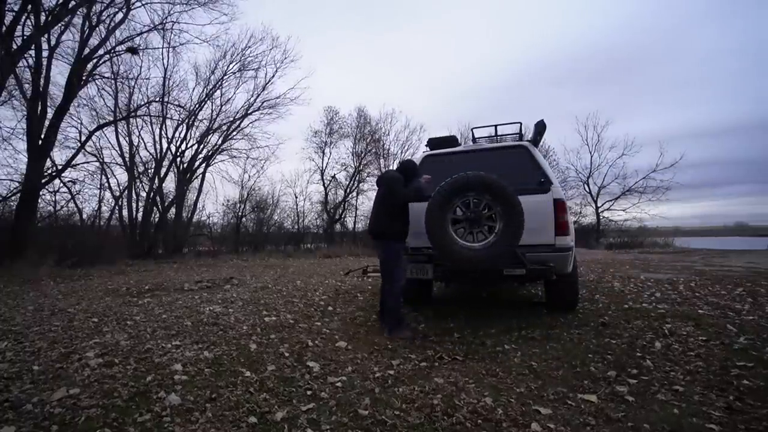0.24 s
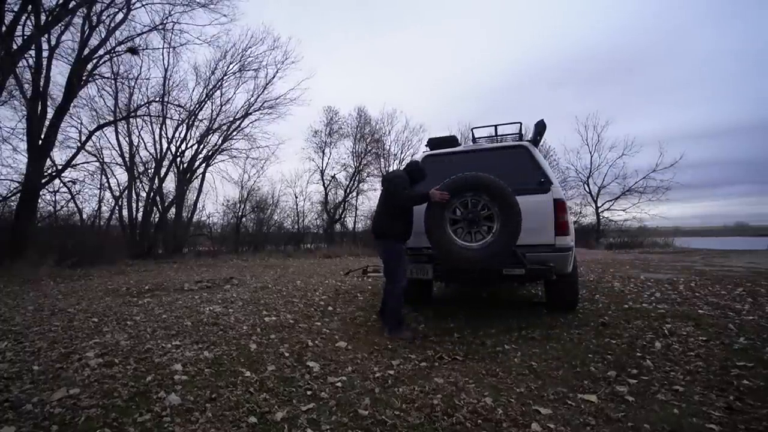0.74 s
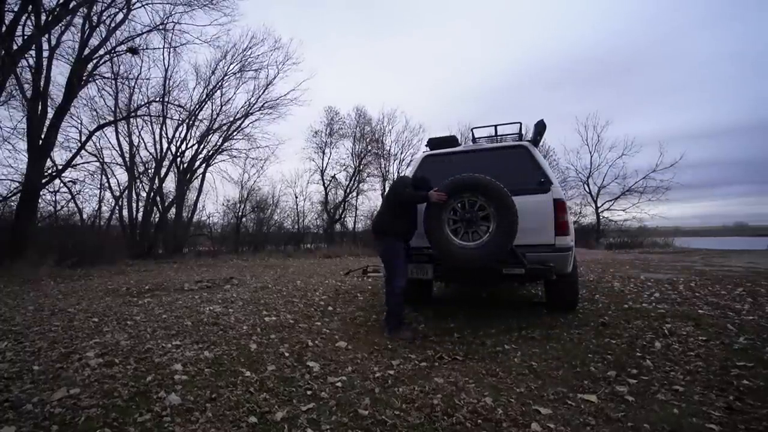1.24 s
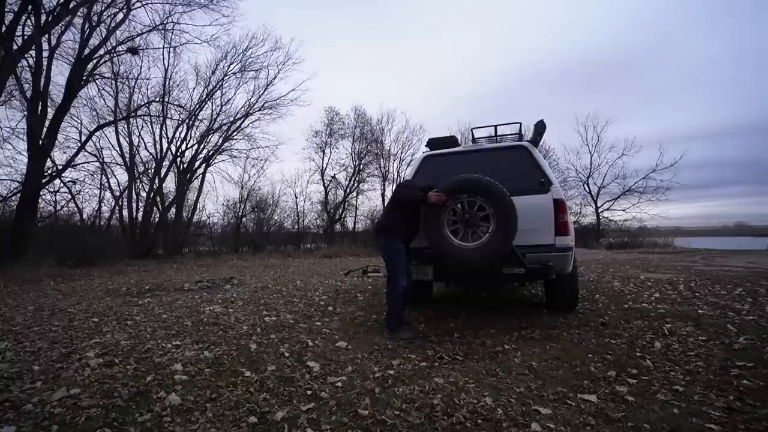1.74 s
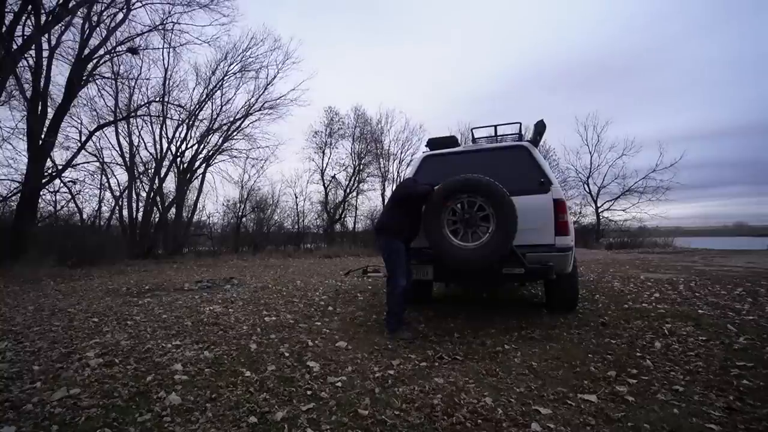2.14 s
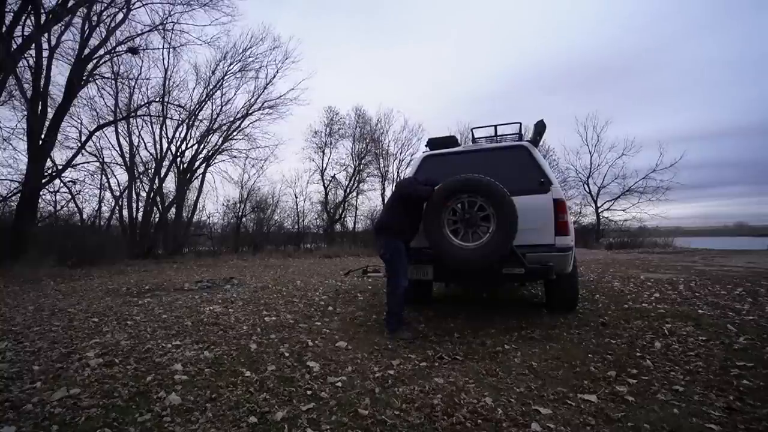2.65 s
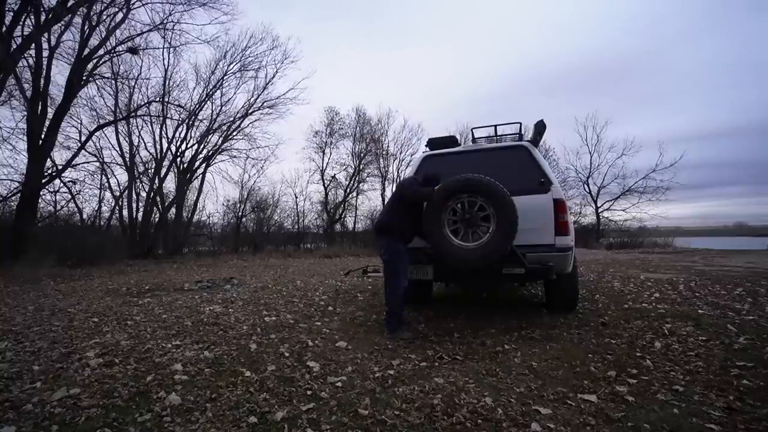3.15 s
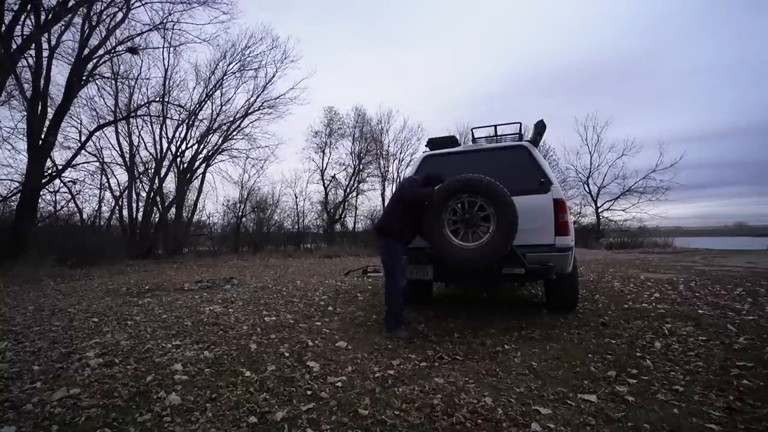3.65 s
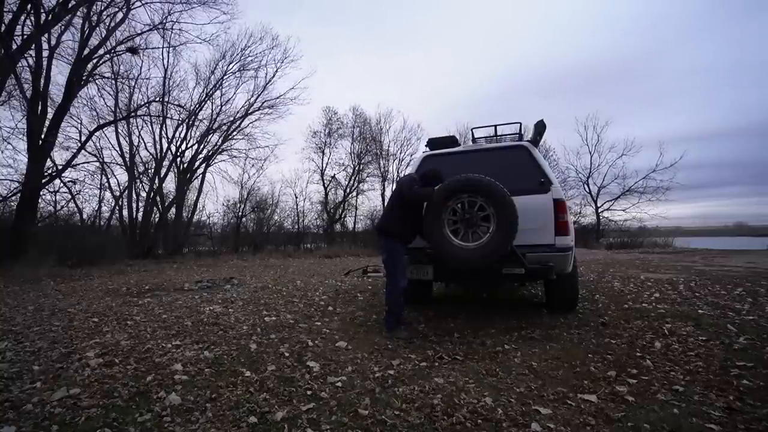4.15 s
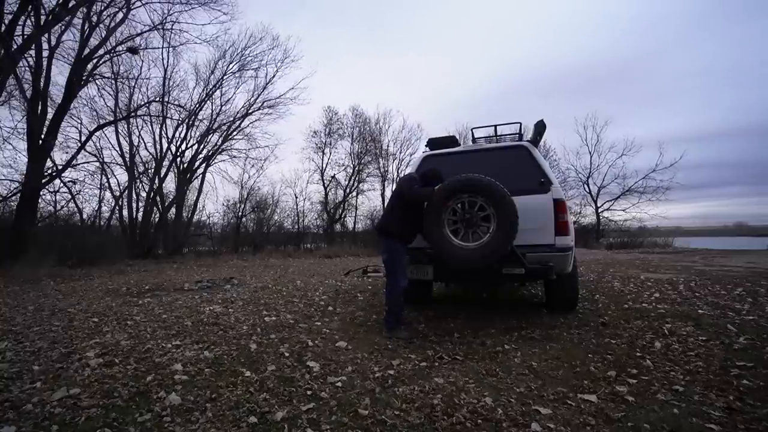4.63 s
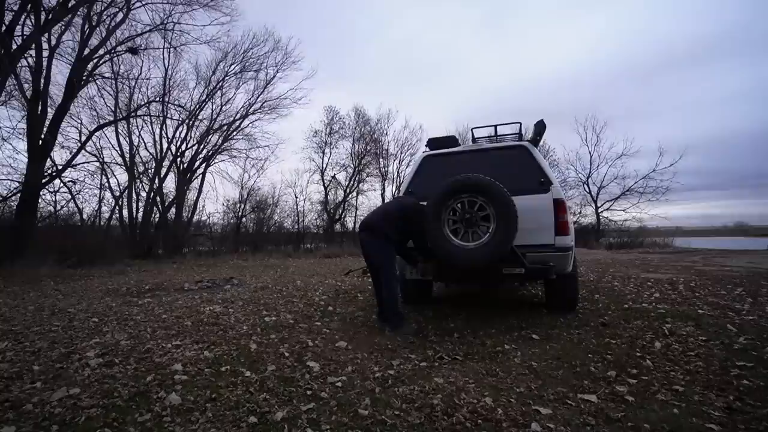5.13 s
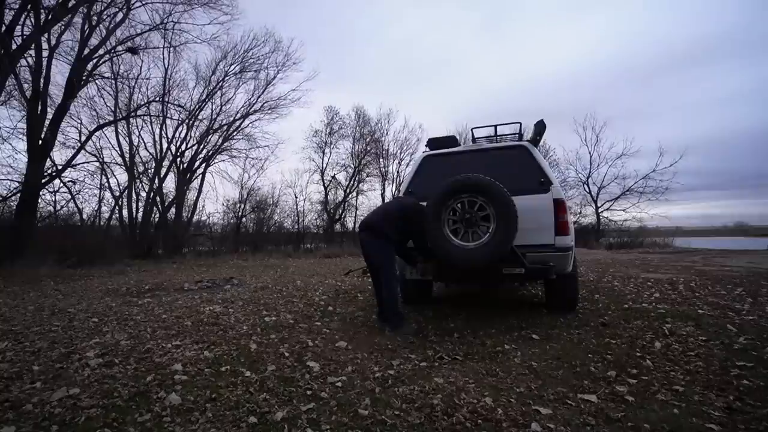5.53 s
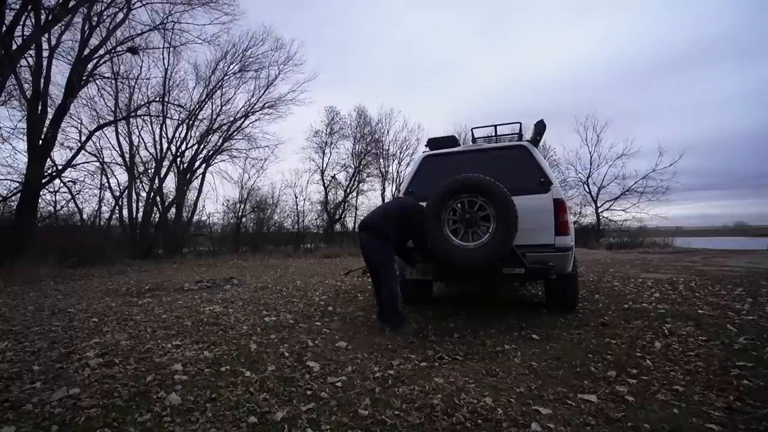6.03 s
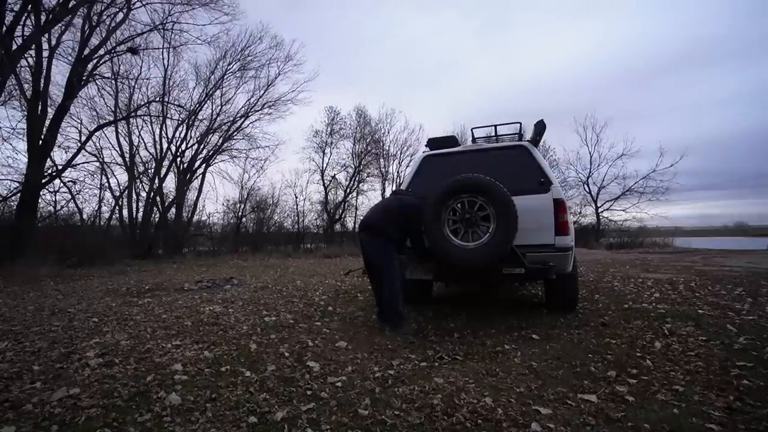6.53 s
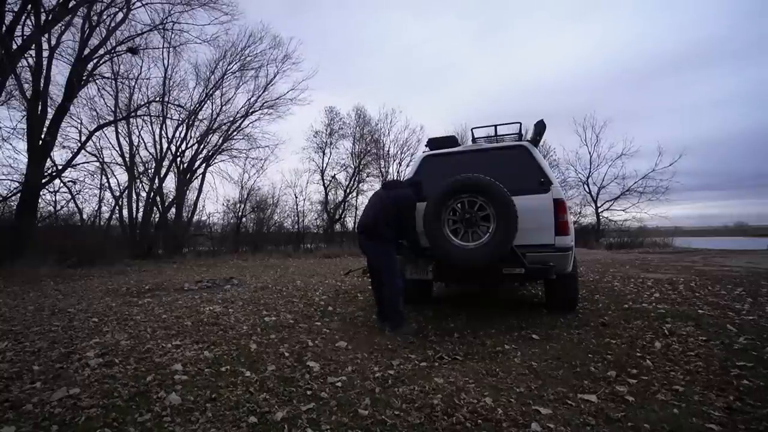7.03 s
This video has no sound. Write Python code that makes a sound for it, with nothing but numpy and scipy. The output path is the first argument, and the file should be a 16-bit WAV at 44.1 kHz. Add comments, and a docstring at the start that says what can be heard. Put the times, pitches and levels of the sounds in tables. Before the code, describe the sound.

One ringing metal slam on a truck, followed by sharp latch clanks and small pin squeaks, with light wind and distant rumble.

```python
"""An open field, at the back of a truck. A steel swing arm carrying a spare wheel hums on its hinge and
slams into the tailgate; then its latch and pin are worked. Each clank rings the steel's modes over a
dense clatter, the pin squeaks by stick-slip, and the tree line answers with a dull tail. Twigs and
small parts tick, cloth and leaves rustle, and a far rumble and faint wind in bare trees fill the air."""
import sys
import numpy as np
from scipy import signal
from scipy.fft import rfft, irfft, next_fast_len
from scipy.io import wavfile
from scipy.ndimage import uniform_filter1d, map_coordinates

SR = 44100
rng = np.random.default_rng(int(sys.argv[2]) if len(sys.argv) > 2 else 0)


def pcm_store(signal):
    """Save signal as 16-bit PCM."""
    levels = np.round(np.clip(np.atleast_2d(signal), -1, 1) * 32767)
    wavfile.write(sys.argv[1], SR, levels.astype(np.int16).T)


N = 321081

# The ring of the steel arm and its latch: pitch_hz, gain_db, t60_s
STEEL_MODES = [(708, -6.5, .24), (826, -9, .13), (1040, -10, .26), (1140, -5, .11), (1225, -9, .23),
               (1310, -17, .3), (1355, -11, .2), (1400, -12.5, .12), (1452, -15, .55), (1505, -10.5, .2),
               (1625, -13, .36), (1690, -17, .35), (1843, -10.5, .25), (1882, -9, .15), (1960, -10, .18),
               (2245, -11, .25), (2345, -7.5, .14), (2665, -17, .15), (3023, -22, .9), (3240, -16, .39),
               (3365, -17, .47), (3735, -6, .07), (4062, -9, .21), (4857, -12, .26), (5030, -9, .13),
               (5380, -14, .21), (5776, -13, .21)]
# Hits on the steel, the slam first: start_s, gain_db, brightness_db_per_octave, bass_db, contact_ms,
# hand_damping_ratio, clatter_db, treble_cut_db_per_octave, then three pairs of pitch_hz, boost_db
# for the modes that the contact point favours
HITS = [(1.297, -11.5, -6.5, -2, 7.5, 1.13, 7, -1, 1140, 12, 3365, 4.5, 1690, 7.6),
        (3.524, -54.5, -2, 16.5, 7.2, 1.1, 5, -3, 1045, 19, 825, 9, 1140, 3),
        (3.584, -47, -8.5, 8, 5, 1.3, 8, 0, 1040, 15, 1400, 5, 1140, 3),
        (3.646, -40, 2.5, -2, 13, 0.93, -4, 0, 1400, 21.4, 3740, 12.5, 3022, 10),
        (3.72, -43.5, 2, 2, 3.5, 1.8, 7, 1, 3022, 9, 3740, 9, 2345, 3.6),
        (3.754, -45.5, -2, 1, 4, .98, 4, 1, 3022, 5, 3740, 10, 1225, 4.5),
        (3.779, -46, -0.5, 4, 4, 1.2, 0, -2, 1400, 7, 1880, 5, 3365, 5.5),
        (4.135, -29, -0.5, 3, 1.8, 0.94, 8, 12, 5380, 13, 708, 6, 3365, 2.7),
        (4.330, -24, -10, 2.5, 3.9, 1.2, 2, -10, 1505, 14.3, 1690, 17, 4062, 7.7),
        (4.422, -34, -17, -6, 3.2, 1.3, -16, -3, 1140, 12, 1505, -1, 1625, 5.7),
        (4.552, -17.5, -1.5, -3.5, 2.7, 1.12, 3.5, -4, 1452, 3.5, 5776, 11, 1040, 7.4),
        (4.809, -44.5, -8, 0, 4, 0.22, -5, -5, 1960, 7, 2245, 11, 1040, 4.6),
        (4.846, -27, -1.5, -0.5, 3.7, 1.44, 4.3, -4, 1845, 9.3, 4856, 11, 3365, 5.9),
        (5.082, -41, -5, -3, 4, 0.82, -18, -6, 1505, 11, 1140, 5, 3365, 4),
        (5.744, -31, 0, 1, 3.3, 1.3, 6, 5, 1400, 16.8, 2245, 13, 3735, 8),
        (5.817, -24, -3, 2.5, 5, 1.28, 5.5, -7, 1140, 6.7, 3240, 9, 1400, 14),
        (5.884, -28, 1.5, -0.5, 2.9, 1.1, 10, 1, 1355, 11.5, 3740, 5, 5380, 4),
        (5.899, -18, 2.5, -6.5, 4.2, 1.33, 9.5, 2.5, 1960, 16.6, 4856, 13, 3022, 2.3),
        (5.999, -65, 15.5, 9, 3.4, 1.7, 2.5, -0.5, 3740, 3.6, 4065, 10, 4856, 3),
        (6.172, -36, -6, 6.5, 4, 2, 3, 3, 1225, 3, 1505, -4, 1040, 4.3),
        (6.759, -44, -8, -2, 4.4, 2.1, 15.5, 2, 1400, 19, 1960, 2, 1355, 7.9),
        (6.797, -31, 0.3, -6, 1.4, 1.6, 10, 9, 708, 18, 2345, 20, 4062, 6.9),
        (6.956, -37.5, -2.7, -22, 4.5, 1.6, 12.5, 11, 1400, 4.6, 2345, 6, 3365, 3),
        (6.973, -26.5, -4, -4.5, 1.5, 2.57, 13.5, 4, 1452, 6, 4062, 17, 1355, 17),
        (7.005, -37, -0.5, -13, 3, 1.44, -3, 3, 1452, 18, 3240, 8, 1505, 2.8)]
# Base tone colour of a hit: frequency_hz, gain_db
HIT_EQ = [(300, -21.5), (800, -11), (1400, -2.5), (2250, -9), (3550, -4.5), (5600, -14), (9000, -31.5),
          (15000, -51)]
# Decay of the steel's many small modes: frequency_hz, t60_s
CLATTER_DECAY = [(300, 0.57), (1200, 0.23), (3000, 0.23), (6000, 0.18), (10000, 0.17)]
# The tailgate and bumper that the arm slams into: pitch_hz, gain_db, t60_s
TAILGATE_MODES = [(109, -29.5, 0.67), (155.4, -20.5, 0.38), (196, -21.5, 0.5), (230, -21.5, 0.36),
                  (315, -24, 0.32), (385, -18, 0.26), (459, -24.5, 0.23), (845, -7.5, 0.047),
                  (902, -10.5, 0.38), (1230, 0, 0.16), (1685, -18, 0.43), (1956, -17, 0.48),
                  (2014, -2.5, 0.14), (2477, -13.5, 0.27)]
# Squeaks of the latch pin: start_s, length_s, start_hz, end_hz, gain_db, fall_db_per_overtone
PIN_SQUEAKS = [(4.915, 0.015, 3500, 3270, -51, 6.5), (4.962, .072, 2080, 1900, -50.5, 4),
               (5.025, 0.042, 3500, 3240, -53, 0), (5.053, 0.038, 4900, 5950, -47.5, -2),
               (5.155, .02, 2330, 2300, -60, -2), (5.165, 0.041, 3000, 2820, -47, 6),
               (5.228, 0.027, 3330, 3200, -64, -3.5), (5.236, 0.037, 6400, 6160, -51.5, 7),
               (5.252, 0.015, 8000, 7160, -47, 13), (5.259, 0.067, 3350, 3360, -53.5, 6),
               (5.343, 0.021, 2950, 2860, -57, 3)]
# Stereo width of the steel and the ticks: frequency_hz, side_gain_db
STEEL_WIDTH = [(300, -71), (1400, -29), (3000, -16), (6000, -13), (12000, -12)]
# Dry ticks of twigs, leaves and small parts: start_s, gain_db, brightness_db_per_octave
DRY_TICKS = [(.11, -43, 8), (.4389, -44, 0), (0.859, -52, -17), (1.629, -44, -9), (1.6476, -40, 2),
             (2.079, -47, 12), (2.3847, -42, 4), (2.4825, -41, 14), (2.5095, -51, 15), (2.6087, -52, 14),
             (4.514, -47, -10), (5.485, -49, -7), (5.6843, -63, -7), (6.02, -48, -8), (6.079, -43, -2.1),
             (6.244, -54, -18), (6.2903, -39.5, 0), (6.318, -53, -9), (6.51, -37.5, 3), (6.5954, -47, -5),
             (6.63, -47, -5), (6.72, -47, -5), (7.13, -35.5, 1), (7.186, -44, 2), (7.218, -47, -13)]
# Base tone colour of a tick: frequency_hz, gain_db
TICK_EQ = [(1200, -4), (3000, 4), (5600, 1.5), (11000, -23), (16000, -40)]
# Stirs of cloth and leaves: start_s, rise_s, hold_s, fall_s, gain_db
RUSTLE_SWELLS = [(0.886, 0.08, 0.03, 0.21, -54.5), (3.494, 0.093, 0.04, .2, -62),
                 (3.636, 0.015, 0.0018, 0.037, -52), (3.712, .009, 0.0018, .2, -66),
                 (4.804, 0.17, 0.1, 0.18, -58), (5.1, 0.16, 0.025, 0.44, -57)]
# Tone colour of the rustle: frequency_hz, gain_db
RUSTLE_EQ = [(350, -2.5), (600, 2), (1670, 6), (2020, 3.5), (3460, 8), (7450, -3), (15000, -25)]
# The scattered answer of the tree line: gain_db, t60_s, lowpass_hz
TREE_REVERB = (-21, .5, 5000)
# Fader moves of the ambience: time_s, rumble_db, wind_db, left_minus_right_db
AIR_FADERS = [(0.0, -52.5, -57, 3), (1.21, -52, -53.5, 2.5), (2.86, -55.5, -58.5, 2.5),
              (3.79, -53.5, -56, 1.5), (4.16, -55.5, -59, 1.5), (4.32, -53.5, -56.5, 1.5),
              (4.99, -55, -55, 1), (5.49, -51.5, -55.5, 2), (5.78, -54, -55, 1.5), (5.92, -50.5, -53.5, 1),
              (6.3, -52.5, -55, 1.5), (6.77, -50.5, -56.5, 1), (6.93, -48, -50.5, 0.5),
              (7.28, -52.5, -53.5, 1)]
# Tone colour of the far rumble: frequency_hz, gain_db
RUMBLE_EQ = [(12, -39), (20, -41.5), (48, -7.5), (141, -1.5), (172, 1.5), (267, -3), (359, -16.5),
             (439, -14.5), (600, -32), (780, -47), (1320, -120)]
# Tone colour of wind in the branches: frequency_hz, gain_db
WIND_EQ = [(210, -21.5), (350, 2), (450, -2), (636, -3), (801, -1.5), (1730, -4.5), (3500, -14.5),
           (4550, -43), (7700, -120)]
# Tone colour of the hiss of twigs: frequency_hz, gain_db
HISS_EQ = [(1180, -29), (2000, -7), (3400, 1), (3740, 1.5), (4110, 2.5), (6990, -4), (11600, -20.5),
           (12900, -35), (15500, -31)]
# Stereo width of the ambience and the rustle: frequency_hz, side_gain_db
AIR_WIDTH = [(60, -27), (200, -30), (380, -20), (700, -14), (1300, -11.5), (2400, -8.5), (4400, -7),
             (8100, -4.5), (15000, -1)]

SLAM_S, PUSH_S = HITS[0][0], 3.522  # the arm hits the tailgate; later, a soft push on it
BASS_HZ, KNEE_HZ, EDGE_HZ = 800, 1400, 4000  # corners of a hit's bass shelf, brightness and treble cut
FAR_HZ, TOP_HZ = 12900, 15700  # distance dulls the steel above the first; the mix ends at the second


def clanks(scatter_db=2):
    """Each hit rings the steel's modes and a dense clatter, in a tone colour of its own."""
    track, t = np.zeros((2, N + SR)), np.arange(SR // 2) / SR
    hz, mode_db, t60 = np.transpose(STEEL_MODES)[:, :, None]
    for start, db, bright_db, bass_db, contact_ms, damping, clatter_db, cut_db, *favoured in HITS:
        def colour_db(f):
            tilt = bright_db * np.log2(np.maximum(f, KNEE_HZ) / KNEE_HZ)
            treble_cut = cut_db * np.log2(np.maximum(f, EDGE_HZ) / EDGE_HZ)
            bass_shelf = along([(BASS_HZ, bass_db), (KNEE_HZ, 0)], f)
            return along(HIT_EQ, f) + tilt - treble_cut + bass_shelf

        favour_db = sum(boost_db * np.exp(-(np.log(hz / boost_hz) / .012) ** 2)
                        for boost_hz, boost_db in np.reshape(favoured, (-1, 2)))
        strength_db = mode_db + favour_db + colour_db(hz) + scatter_db * rng.standard_normal(hz.shape)
        attack_s = np.clip(contact_ms / 3000, 2e-4, .02)  # the sound builds while the parts touch
        ring = ringing(hz, strength_db, t60 / damping, attack_s, smear=.065)
        uneven_db = ripple(depth_db=6, spacing_hz=55)
        dense = filtered(clatter(damping), lambda f: amp(clatter_db + colour_db(f) + uneven_db(f)))
        add(track, start, amp(db) * (ring + (1 - np.exp(-t / attack_s)) * dense))
    return track


def ringing(hz, db, t60, attack_s, smear):
    """Decaying modes with wandering phase, summed twice in different phases for mid and side."""
    t = np.arange(SR // 2) / SR
    steps = rng.standard_normal((len(hz), len(t) // 64 + 1))
    drift = np.cumsum(steps, axis=1).repeat(64, axis=1)[:, :len(t)]
    phase = 2 * np.pi * hz * t + smear * drift
    envelope = amp(db - 60 * t / t60) * (1 - np.exp(-t / attack_s))
    signs = rng.choice([-1, 1], hz.shape)
    return np.sum(envelope * [np.sin(phase), signs * np.cos(phase)], axis=1)


def clatter(damping):
    """Many small modes blur into mid and side noise tails; the highs die first."""
    hz, t, noise = signal.stft(rng.standard_normal((2, SR // 2)), SR, nperseg=128)
    decay = amp(-60 * damping * t / along(CLATTER_DECAY, hz)[:, None])
    return signal.istft(noise * decay, SR, nperseg=128)[1][:, :SR // 2]


def ripple(depth_db, spacing_hz):
    """A random, jagged EQ curve: different small modes stand out in each hit."""
    knots = rng.standard_normal(round(SR / 2 / spacing_hz) + 2)
    return lambda f: depth_db * np.interp(f / spacing_hz, np.arange(len(knots)), knots)


def tailgate(slam_db=-13, push_db=-19, push_lowpass_hz=450, attack_cycles=1.3):
    """The slam rings the whole tailgate; the soft push sounds only its low modes."""
    track = np.zeros((2, N + SR))
    hz, mode_db, t60 = np.transpose(TAILGATE_MODES)[:, :, None]
    attack_s = attack_cycles / hz
    add(track, SLAM_S, amp(slam_db) * ringing(hz, mode_db, t60, attack_s, smear=.08))
    muffled_db = mode_db - 40 * np.log10(1 + (hz / push_lowpass_hz) ** 2)
    add(track, PUSH_S, amp(push_db) * ringing(hz, muffled_db, t60 / 2, attack_s, smear=.08))
    return track


def squeaks(glide_power=.325, waver=.036, lowpass_hz=8000):
    """The pin sticks and slips in gliding tones; uneven slips shake their pitch and level."""
    track, harmonic = np.zeros((2, N + SR)), np.arange(1, 6)[:, None]
    flutter, shake_db = waver * wobble(700), 2.5 * wobble(200)
    for start, length, start_hz, end_hz, db, fall_db in PIN_SQUEAKS:
        progress, at = np.linspace(0, 1, round(length * SR)), round(start * SR)
        span = slice(at, at + len(progress))
        glide_hz = start_hz + (end_hz - start_hz) * progress ** glide_power  # quick, then settling
        hz = glide_hz * (1 + flutter[span])
        phase = 2 * np.pi * harmonic * np.cumsum(hz) / SR
        arch = np.abs(np.sin(np.pi * progress)) ** .5
        envelope = arch * amp(db - fall_db * (harmonic - 1) + shake_db[span]) * (harmonic * hz < TOP_HZ)
        add(track, start, np.sum(envelope * [np.sin(phase), np.cos(phase)], axis=1))
    return filtered(track, lambda f: 1 / (1 + (f / lowpass_hz) ** 4))


def ticks(attack_s=.0008, t60_s=.02, pivot_hz=5600):
    """Twigs, leaves and small parts tick: short noise bursts, some brighter than others."""
    track, t = np.zeros((2, N + SR)), np.arange(SR // 10) / SR
    for start, db, bright_db in DRY_TICKS:
        colour_db = lambda f: along(TICK_EQ, f) + bright_db * np.log2(np.clip(f / pivot_hz, .5, 2))
        burst = filtered(rng.standard_normal((2, len(t))), lambda f: amp(colour_db(f)))
        envelope = amp(db - 60 * t / t60_s) * (1 - np.exp(-t / attack_s))
        add(track, start, envelope * burst)
    return stereo(*track[:, :N], STEEL_WIDTH)


def hinge(start_s=1.066, rise_s=.056, gain_db=-55.5, fade_db_per_s=49, centre_hz=3240, half_width_hz=370):
    """The hinge rubs as the arm swings: a narrow hum of noise that stops at the slam."""
    t = np.arange(N) / SR
    hum = filtered(rng.standard_normal(N), lambda f: 1 / (1 + ((f - centre_hz) / half_width_hz) ** 2))
    since = t - start_s
    swing = np.clip(since / rise_s, 0, 1) * amp(gain_db - fade_db_per_s * np.abs(since - rise_s))
    return swing * (t < SLAM_S) * amp(1.8 * wobble(60)) * unit(hum)


def rustle(ramp_db=25):
    """Cloth and leaves stir in grainy swells while hands and feet move."""
    t, swells = np.arange(N) / SR, np.zeros(N)
    for start, rise, hold, fall, db in RUSTLE_SWELLS:
        fade_in = np.maximum(0, 1 - (t - start) / rise)
        fade_out = np.maximum(0, t - start - rise - hold) / fall
        swells += amp(db - ramp_db * (fade_in + fade_out))
    grain = amp(2.5 * wobble(120))
    return swells * grain * noise_bed(RUSTLE_EQ, patchy_db=2.2)


def tree_line(sound):
    """The trees scatter a sound back as a dull, diffuse tail."""
    db, t60, lowpass_hz = TREE_REVERB
    t = np.arange(SR * 3 // 4) / SR
    band = lambda f: f / (f + 500) / (1 + (f / lowpass_hz) ** 2)
    tail = filtered(rng.standard_normal(len(t)), band) * amp(-60 * t / t60)
    return amp(db) * signal.fftconvolve(sound, tail[None] / np.linalg.norm(tail), axes=1)[:, :N]


def air(wind_trim_db=-1.03, hiss_trim_db=-7.5, hiss_follow=.67):
    """A far rumble, wind in the branches, and a hiss of twigs that partly follows the wind."""
    rumble_db, wind_db, pan_db = automation(AIR_FADERS)
    gust, mean_db = wobble(2.0), wind_db.mean()
    rumble = amp(rumble_db) * noise_bed(RUMBLE_EQ, patchy_db=1.2)
    wind = amp(wind_db + wind_trim_db + .19 * gust) * noise_bed(WIND_EQ, patchy_db=1.78)
    hiss_db = mean_db + hiss_trim_db + hiss_follow * (wind_db - mean_db) + .93 * gust
    hiss = amp(hiss_db) * noise_bed(HISS_EQ, patchy_db=1.6)
    return rumble + (wind + hiss) * amp([pan_db / 2, -pan_db / 2])


def noise_bed(eq, patchy_db):
    """Coloured stereo noise at rms 1 that flickers in patches of time and frequency."""
    noise = signal.stft(rng.standard_normal((2, N)), nperseg=512)[2]
    patches = uniform_filter1d(rng.standard_normal(noise.shape[1:]), size=6, axis=0)
    patches = uniform_filter1d(patches, size=14, axis=1)
    pair = signal.istft(noise * amp(patchy_db * unit(patches)), nperseg=512)[1][:, :N]
    mid, side = filtered(pair, lambda hz: amp(along(eq, hz)))
    return unit(stereo(mid, side, AIR_WIDTH))


def amp(db):
    """Gain of a level in dB."""
    return 10 ** (np.asarray(db) / 20)


def unit(x):
    """x at rms 1."""
    return x / np.sqrt(np.mean(x ** 2) + 1e-20)


def along(points, hz):
    """Read a curve of (frequency_hz, value) points on a log frequency axis."""
    f, values = np.transpose(points)
    return np.interp(np.log(hz + 1), np.log(f + 1), values)


def automation(rows):
    """One value per sample for each column after the time."""
    times, *columns = np.transpose(rows)
    return [np.interp(np.arange(N) / SR, times, column) for column in columns]


def wobble(rate):
    """A smooth random curve, rate knots a second."""
    return map_coordinates(rng.standard_normal(int(N * rate / SR) + 4), [np.arange(N) * rate / SR])


def filtered(x, response):
    """EQ x with a gain that is a function of frequency."""
    size = next_fast_len(x.shape[-1] + 8192)
    return irfft(rfft(x, size) * response(np.fft.rfftfreq(size, 1 / SR)), size)[..., :x.shape[-1]]


def stereo(mid, side, width):
    """Left and right: the mid plus and minus the side, shaped by a width curve."""
    spread = filtered(side, lambda hz: amp(along(width, hz)))
    return np.array([mid + spread, mid - spread])


def add(track, start_s, sound):
    """Mix a sound into the track at start_s."""
    at = round(start_s * SR)
    track[..., at:at + sound.shape[-1]] += sound


def scene():
    """The full mix; the steel is softened by distance and sits a little to the left."""
    mid, side = (clanks() + tailgate() + squeaks())[:, :N]
    steel = filtered(stereo(mid, side, STEEL_WIDTH), lambda f: 1 / (1 + (f / FAR_HZ) ** 6))
    steel *= amp([[.15], [-.15]])
    return steel + tree_line(steel) + ticks() + hinge() + rustle() + air()


def record(dry):
    """A brick-wall high cut on the mix."""
    return filtered(dry, lambda hz: hz < TOP_HZ)


dry = scene()
out = record(dry)
pcm_store(out)
```